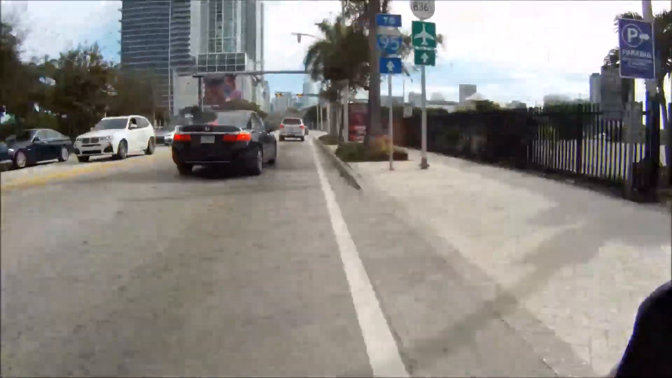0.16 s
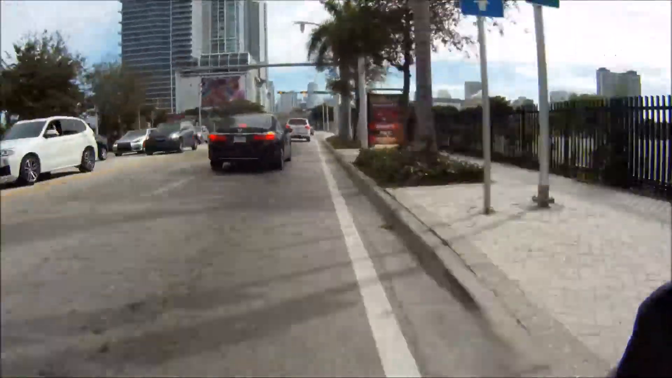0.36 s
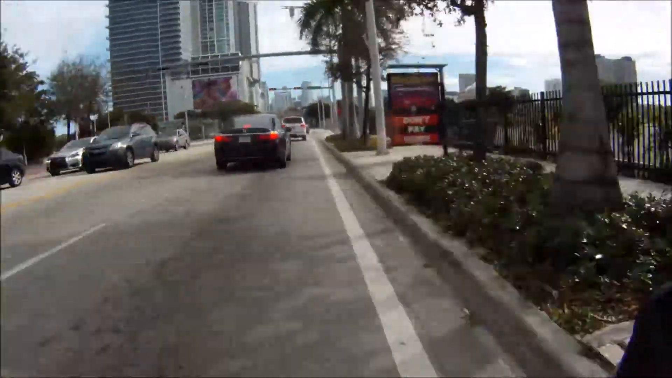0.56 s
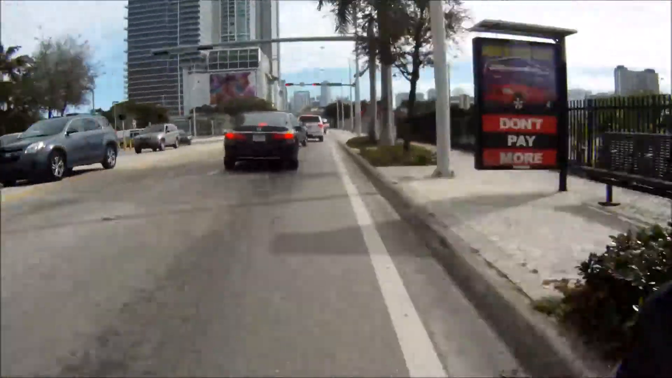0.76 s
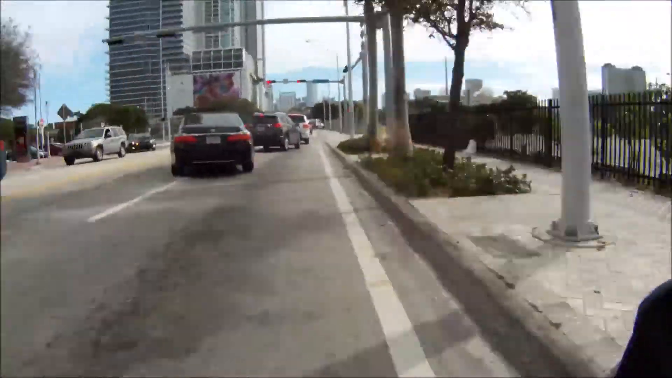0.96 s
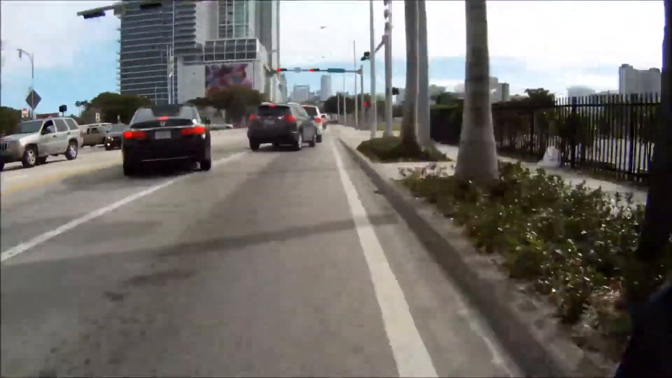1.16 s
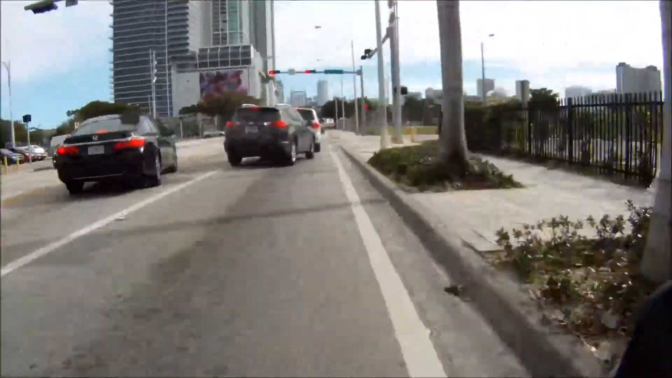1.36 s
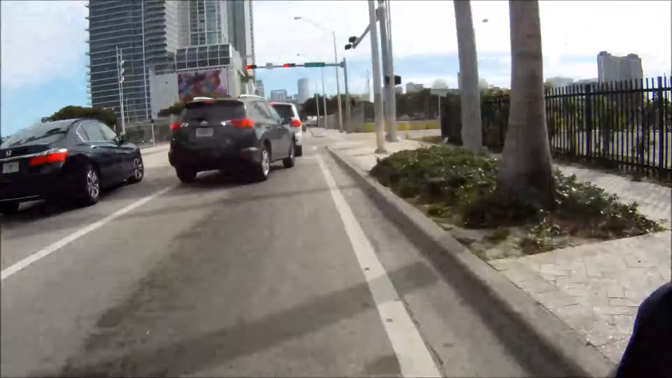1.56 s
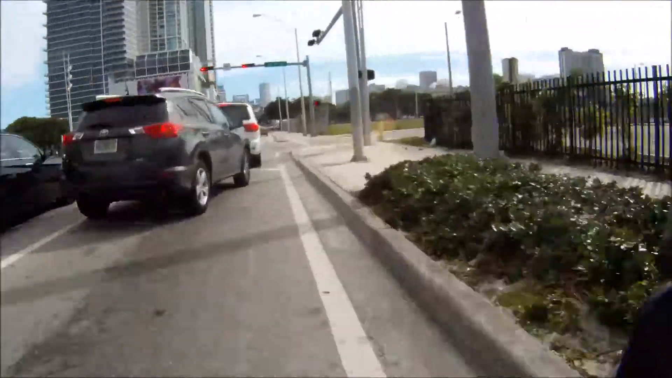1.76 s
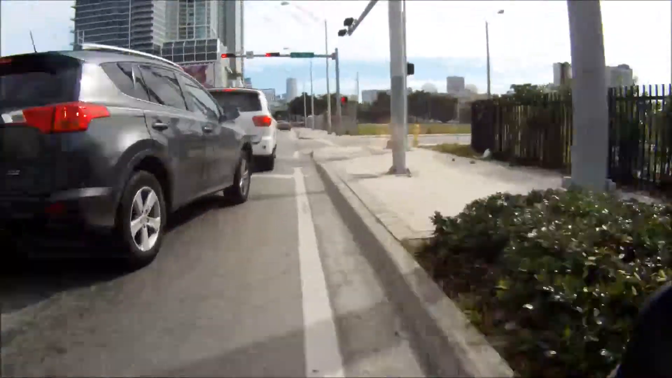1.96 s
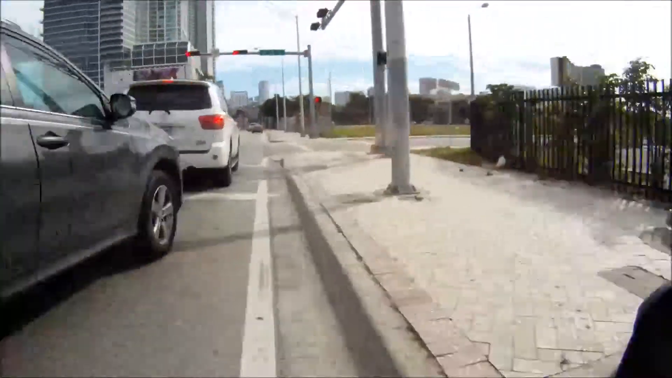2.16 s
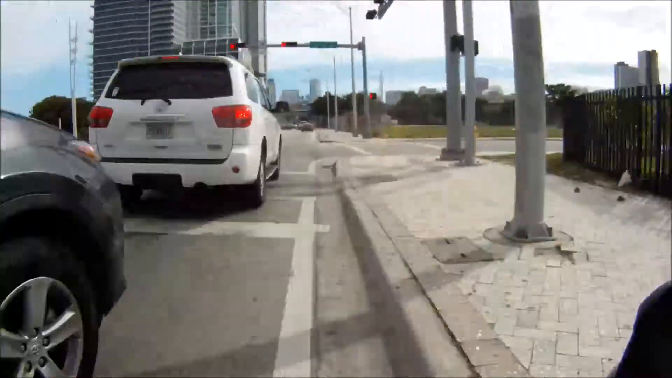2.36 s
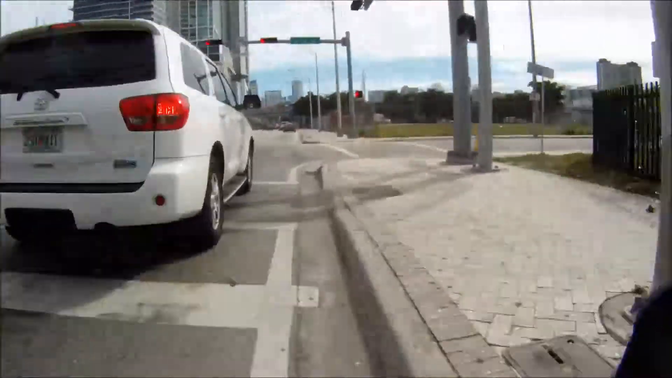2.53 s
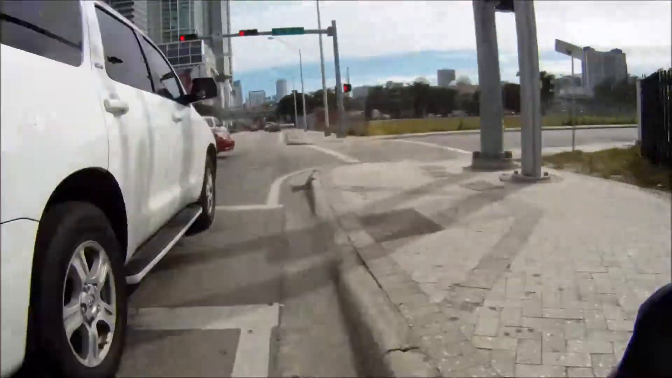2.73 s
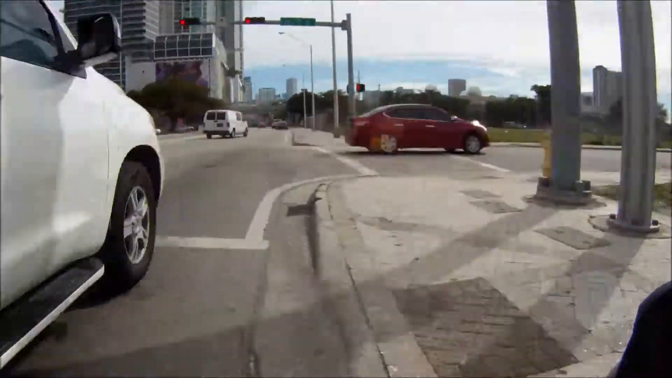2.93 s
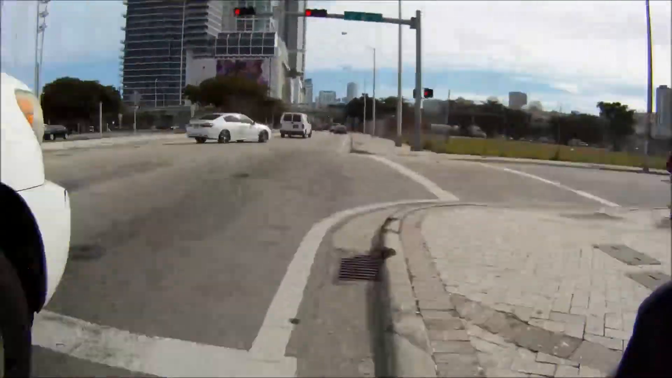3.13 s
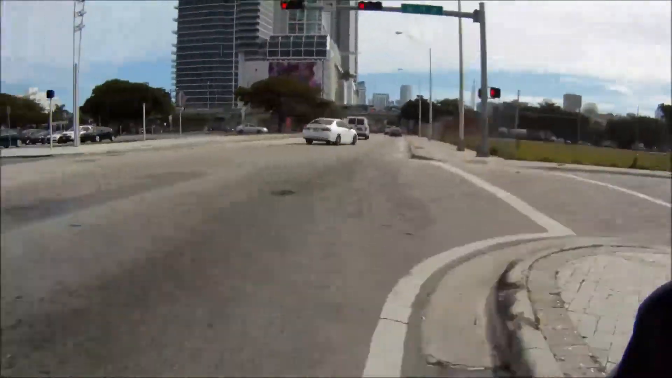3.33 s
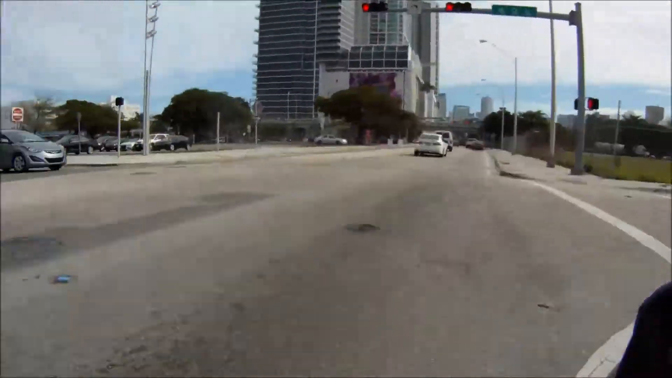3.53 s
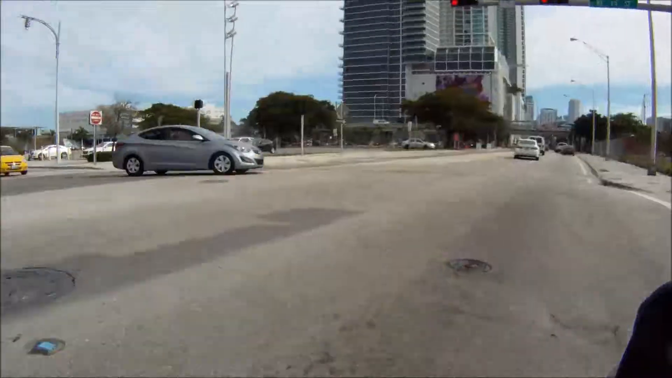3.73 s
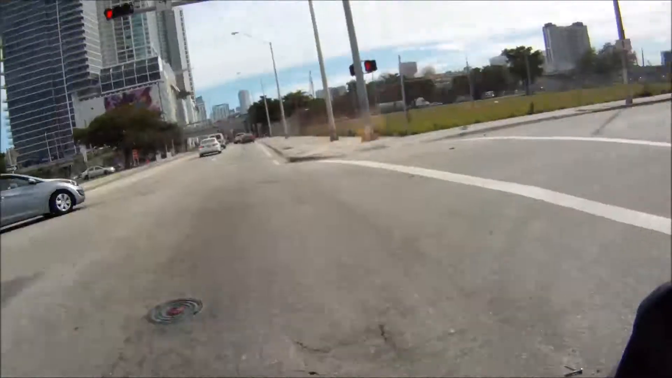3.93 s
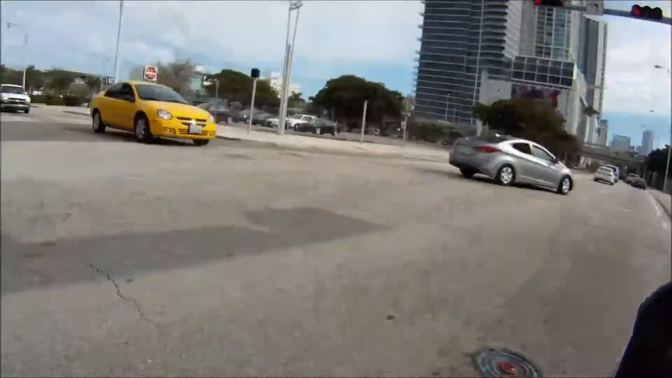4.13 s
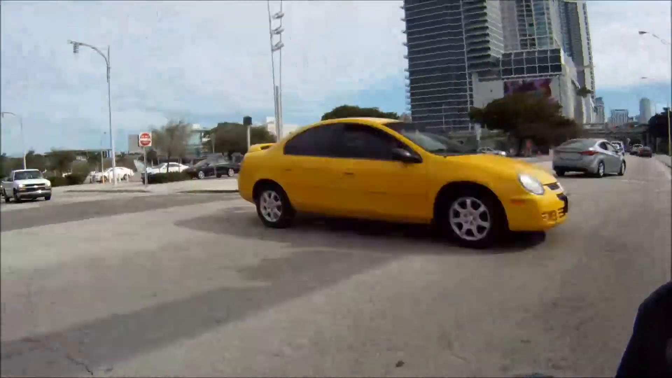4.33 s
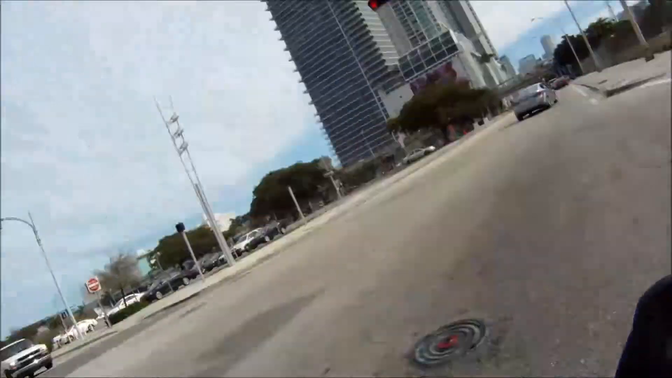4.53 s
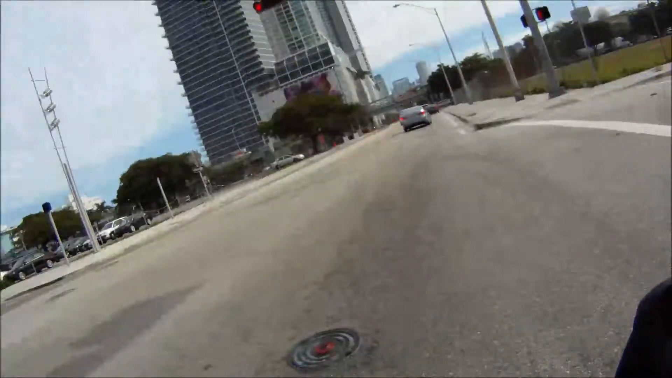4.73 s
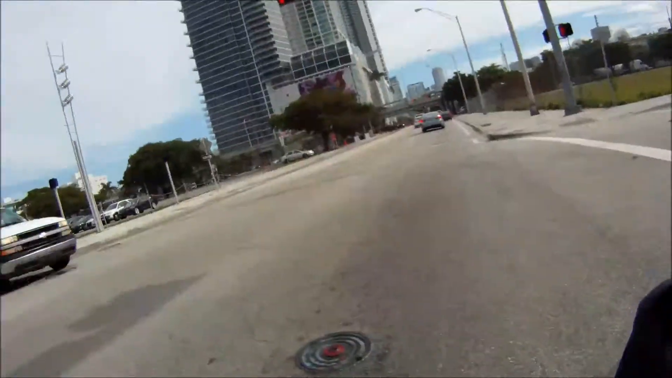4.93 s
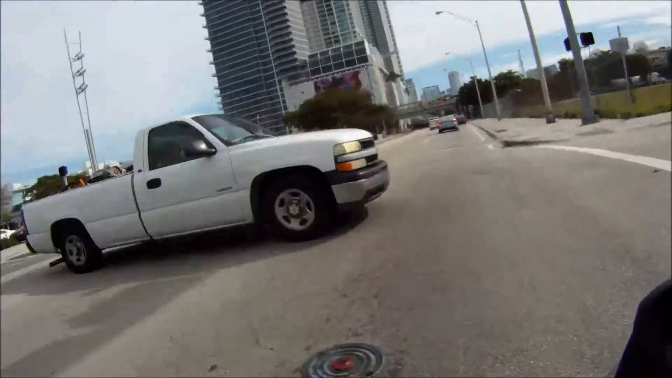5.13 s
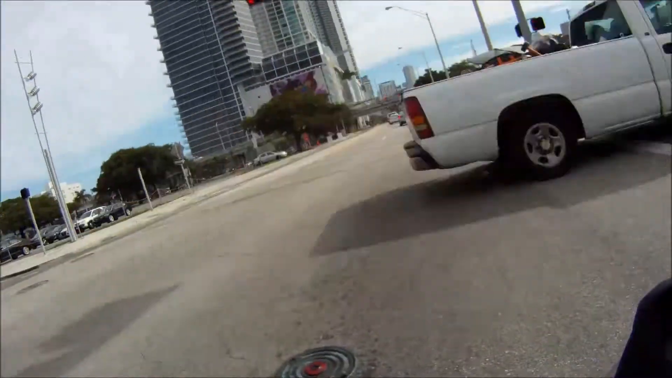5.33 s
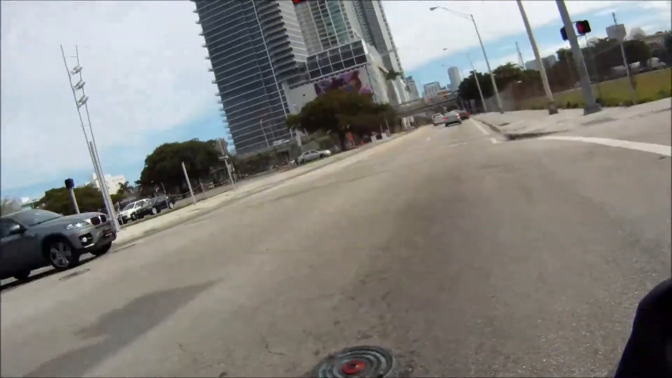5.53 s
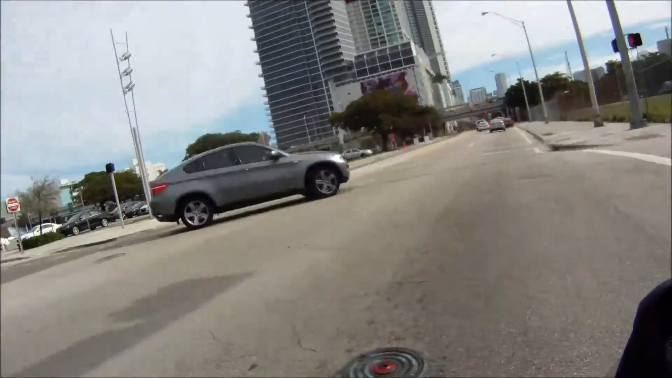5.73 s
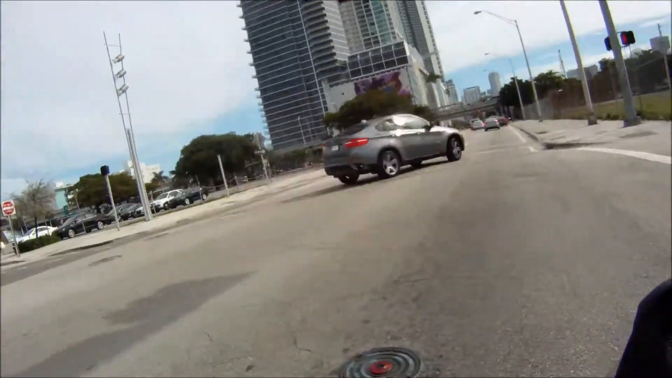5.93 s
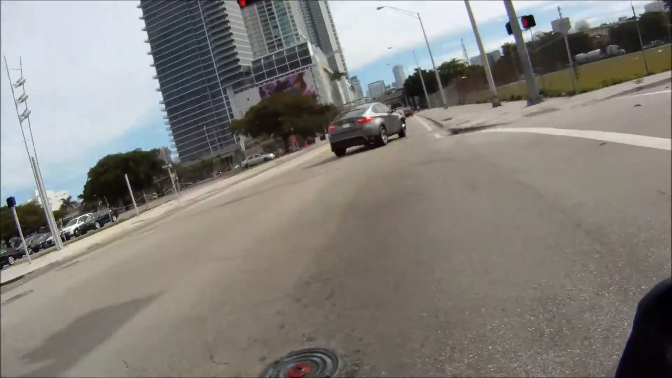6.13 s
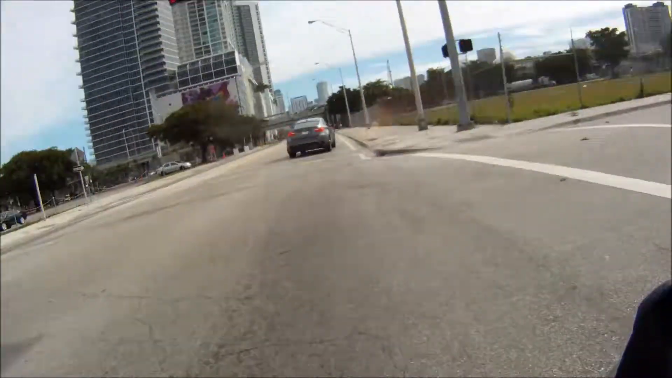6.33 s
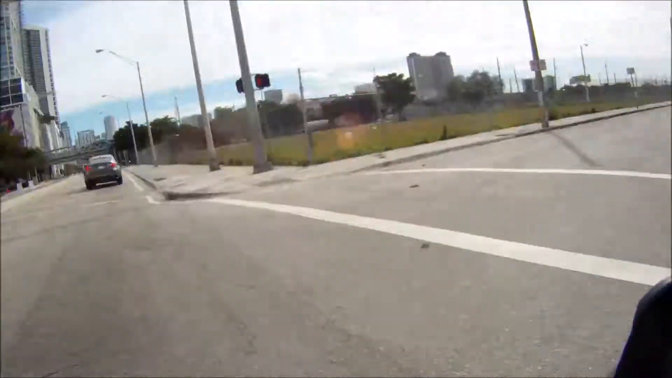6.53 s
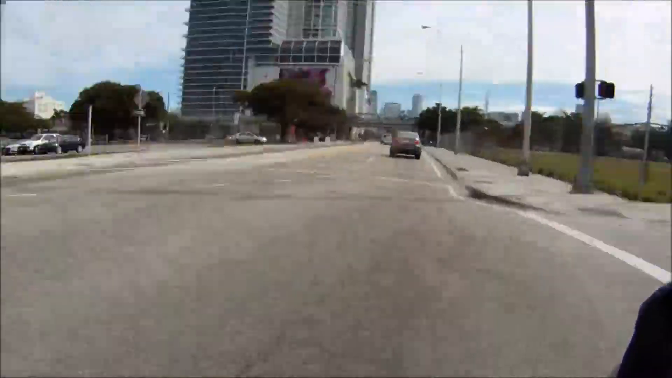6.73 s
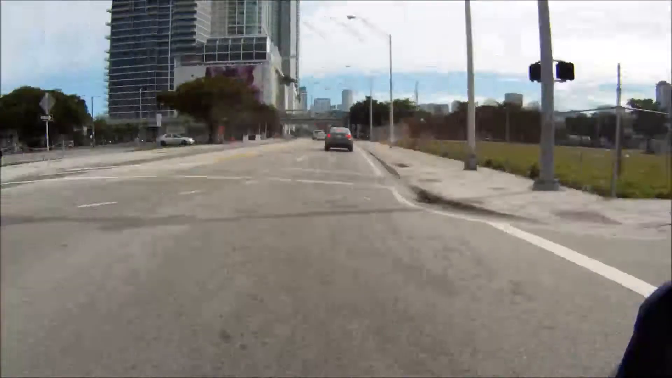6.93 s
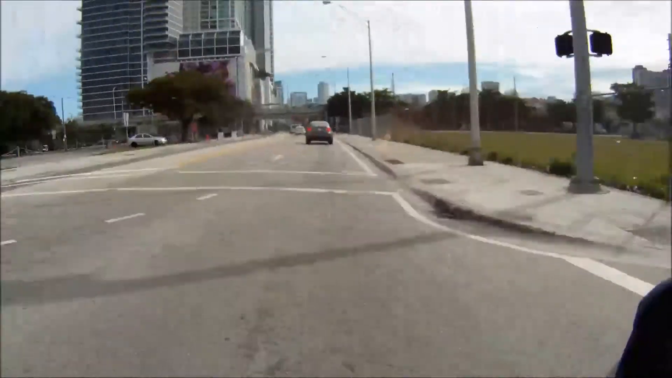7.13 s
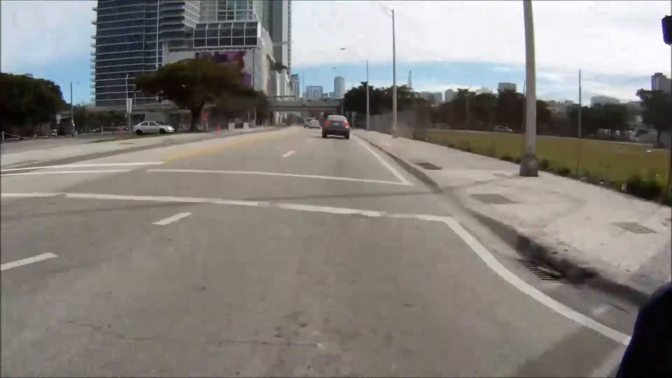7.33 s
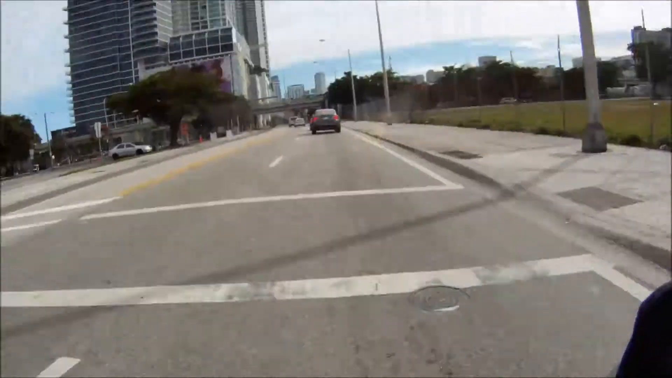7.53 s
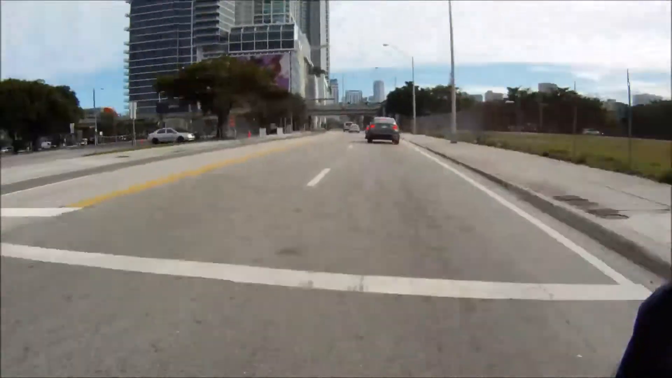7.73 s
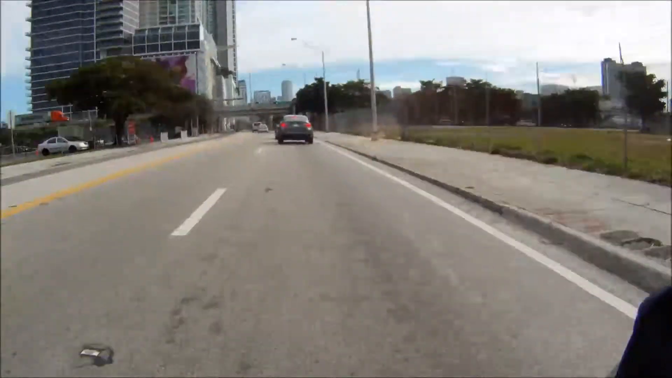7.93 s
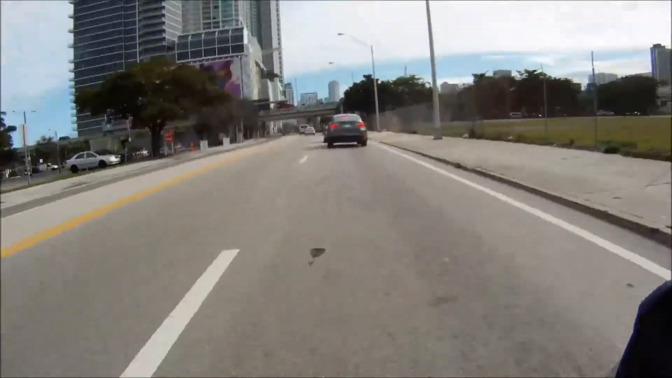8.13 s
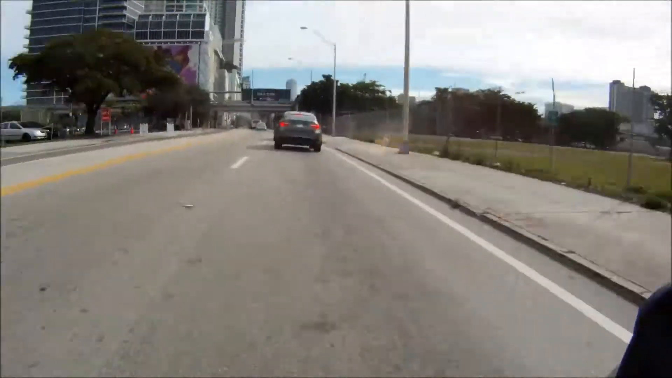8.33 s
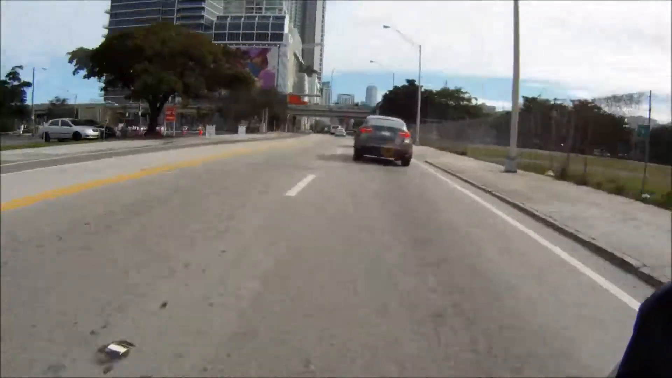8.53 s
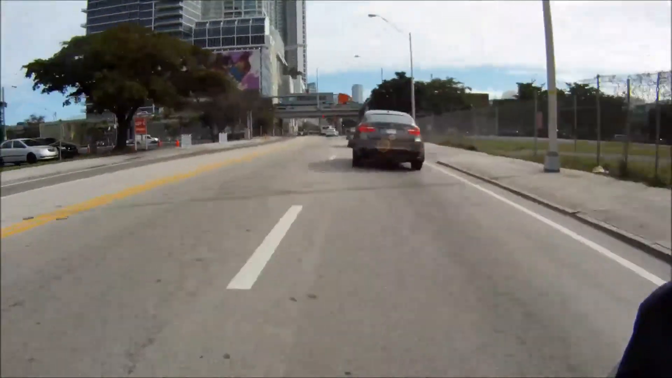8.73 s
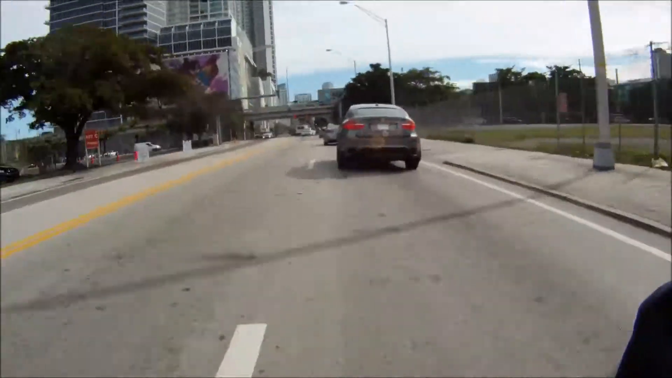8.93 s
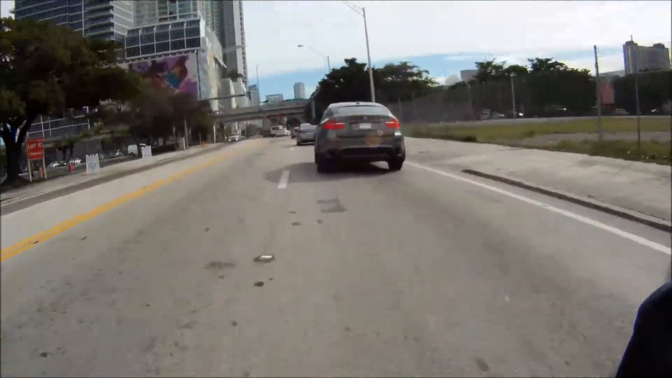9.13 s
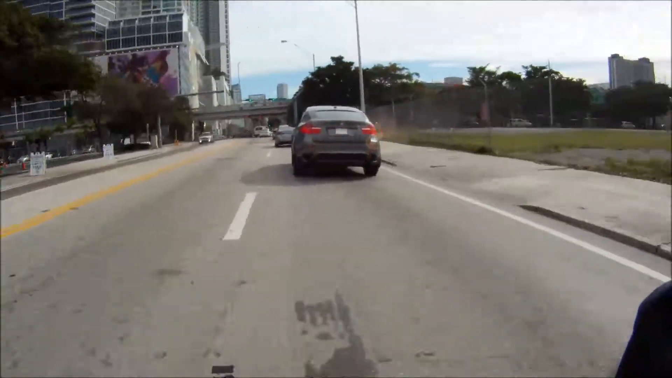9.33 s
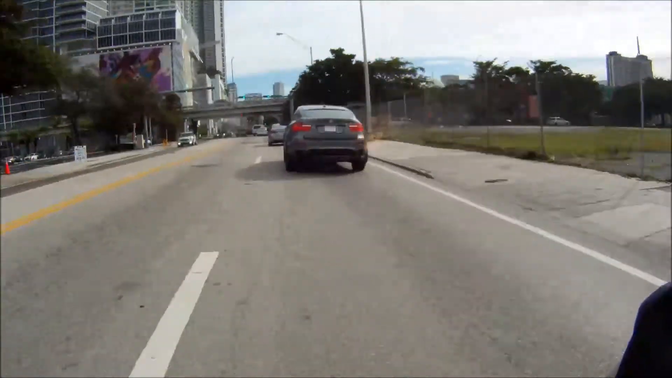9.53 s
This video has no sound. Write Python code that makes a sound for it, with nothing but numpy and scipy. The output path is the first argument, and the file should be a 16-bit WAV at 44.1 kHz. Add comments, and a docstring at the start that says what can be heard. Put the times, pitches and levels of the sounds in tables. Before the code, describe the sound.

A bike rolls on city asphalt, heard close, boxy and dull. Steady rumble gives way to fast clattering and thudding over rough ground, then quieter bumpy rolling. Hard isolated clacks, clicks and rubs mark the stop, followed by a near-silent pause over thin hiss. A sharp knock and short squeak begin the restart, a few more clacks follow, and a slightly singing road rumble continues to the end.

```python
"""Rumble, knocks, rattles and scrapes of a bicycle that rolls on asphalt, stops and sets off again.
A microphone in a closed plastic housing is clamped to it and hears it mostly through the frame.
Noise for the road, clicks for loose parts and short bursts for knocks drive the resonances of mount,
tubes and housing; thin steel rings, brief narrow tones squeak or ring on, jolts swing the mount,
and faint hiss lies under it all."""
import sys
import numpy as np
from scipy import signal
from scipy.fft import rfft, irfft
from scipy.io import wavfile

SR = 44100
rng = np.random.default_rng(int(sys.argv[2]) if len(sys.argv) > 2 else 0)


def dump_mix(stems):
    """Bounce the given channels to the path in sys.argv[1] as a 16-bit WAV at rate SR."""
    frames = np.atleast_2d(stems).T  # one column per channel
    limited = np.clip(frames, -1, 1)  # hard clip at full scale
    pcm = np.round(limited * 32767).astype(np.int16)
    wavfile.write(sys.argv[1], SR, pcm)


N = 426447

# knocks: (time [s], blow level [dB], share of tubes, of housing, of sizzle [dB re blow, rms of first 10 ms],
# housing pitch [Hz], sizzle pitch [Hz], ring of thin steel [dB re blow])
KNOCKS = [(0.7076, -15.5, -18, -10, -20, 3680, 8590, -10), (0.971, -14.5, -4, -15, -26, 3100, 6900, -8),
          (0.9833, -15, -1, -10, -23, 2280, 6350, 0), (1.0051, -12.5, -5.5, -7, -32, 2230, 6770, -18),
          (1.0416, -24, -8, -10, -30, 2300, 6800, -12), (1.0575, -24, 0.5, -18, -28, 2200, 6800, -12),
          (1.066, -15.5, -2.5, -14, -26, 3270, 6260, -15), (1.0784, -15, -0.5, -10, -21, 1990, 8500, -14),
          (1.1027, -14.5, -2, -9, -17, 2200, 6700, -21), (1.158, -20.5, 0, -22, -28, 2200, 6800, -12),
          (1.1773, -17, -5, -15, -31, 3300, 6800, -7), (1.2072, -16, -6, -10.5, -29, 2200, 6800, -12),
          (1.2155, -16, -8, -13, -26, 2210, 6800, -12), (1.258, -4, -11, -15.5, -28.5, 1980, 7070, -19),
          (1.271, -16, 0.5, -17, -26, 2230, 6800, -12), (1.2885, -26, -16, -7, -28, 3300, 6800, -12),
          (1.3159, -12, -3, -7.5, -33, 2300, 6340, -18), (1.3434, -19, -4, -17, -26, 3300, 6800, -12),
          (1.379, -19, -4, -14, -28, 2200, 6800, -12), (1.4038, -16, -2.5, -12, -29, 2300, 6800, -4),
          (1.4341, -6, -13, -17.5, -35, 3080, 8260, 2.5), (1.451, -23, 2, -22, -28, 2300, 6800, -12),
          (1.4696, -25, -2, -15, -28, 2180, 6800, -12), (1.505, -23, -1, -18, -30, 2200, 6800, -12),
          (1.5195, -20, -1, -14, -26, 3300, 6800, -12), (1.5324, -17.5, 1, -8.5, -21, 3200, 6540, -8),
          (1.5663, -17, -3, -13.5, -26, 3180, 6260, -10), (1.6612, -18, -0.5, -10, -25, 3240, 8360, -16),
          (1.679, -20, 0, -18, -24, 2250, 6800, -14), (1.716, -23, -0.5, -16, -22, 3380, 8440, -10),
          (1.7489, -21.5, 4, -18, -24, 3330, 9520, -14), (1.8108, -37, -20, -21, -3, 2330, 10500, -10),
          (1.8504, -31, -19, -17, -7.5, 2370, 6630, -10), (1.9083, -3.5, -21.5, -17, -22, 2970, 7180, -4.5),
          (2.06, -17.5, -12, -25, -18.5, 2200, 6580, 5.5), (2.1231, -18, -17, -17, -12.5, 2030, 6600, -10),
          (2.41, -26.5, -20, -10, -18, 3700, 6600, -15), (3.342, -28.5, -20, -9, -22, 3300, 6600, -15),
          (3.524, -23, -23, -16, -13, 3680, 6380, -15), (3.5849, -11.5, -25, -9, -10.5, 3930, 6740, -25),
          (3.7559, -5, -19, -9.5, -29.5, 3450, 8300, -1.5), (3.771, -27, -30, -25, -8, 3400, 8500, -20),
          (3.7969, -16, -15, -8, -24, 3020, 6600, 0), (3.8668, -24.5, -30, -10.5, -15, 2170, 7200, -8),
          (3.8942, -15.5, -37, -9.5, -17.5, 4070, 5570, -18), (3.941, -22, -27, -17, -16, 3140, 10100, -13),
          (3.9902, -20.5, -23, -16, -8.5, 3040, 6800, -9), (4.0382, -23, -35, -9.5, -16, 2160, 8800, -6),
          (4.2028, -27, -19, -4, -35, 2170, 10200, -12), (4.2732, -4.5, -14, -8, -34, 2770, 8600, 1.5),
          (4.322, -10.5, -31, -23, -19.5, 3800, 6640, -20), (4.42, -34, -29, -8, -20, 3600, 6800, -12),
          (4.4265, -33, -29, -11, -12, 3300, 9900, -12), (4.449, -37, -29, -14, -9, 3300, 10200, -12),
          (4.482, -26, -11.5, -17, -19, 3780, 9900, -19), (4.5423, -17.5, -30, -15, -26, 3900, 6860, -10),
          (4.582, -27, -28, -8, -14, 3300, 8400, -16), (4.607, -32, -25, -12, -11, 4200, 10300, -12),
          (4.6201, -26.5, -11, -8, -18, 3680, 6430, -11), (4.665, -32.5, -30, -20, -8, 3600, 7500, -15),
          (4.6708, -26.5, -30, -36, -7.5, 2240, 8100, -4.5),
          (4.7252, -33.5, -6, -9, -24, 3840, 6870, -14.5), (4.745, -37, -21, -12, -21, 4200, 6800, -12),
          (4.767, -38, -11, -16, -23, 2700, 6800, -12), (4.785, -27, -10, -18, -24, 2100, 8810, -8.5),
          (4.8282, -19, -20, -10.5, -27, 3450, 8870, 4), (4.837, -19.5, -7, -12, -22, 2220, 8800, -14.5),
          (4.9621, -38, -29, -6, -6, 3350, 6590, -4.5), (5.004, 8, -33, -16.5, -30, 2960, 8200, -5.5),
          (5.0355, -22, -13, -12, -17, 2020, 8780, -13), (5.0665, -14.5, -9.5, -13, -24, 2070, 8400, 5.5),
          (5.1422, -3.5, -36, -7, -18, 2390, 6700, 0.5), (5.178, -31, -10, -18, -11, 2620, 6420, -13.5),
          (5.218, -30, -21, -8, -10, 2720, 7080, -8), (5.2627, 4, -19.5, -18, -31.5, 2260, 8150, -3),
          (5.4045, -24.5, -42, -30.5, -9, 2020, 10400, -16), (5.43, -26, -17, -15, -20, 2700, 6690, 2),
          (5.4833, -14.5, -25.5, -13, -14.5, 2740, 6660, -6.5),
          (5.5966, -34, -9.5, -20, -13, 3820, 7050, 2), (5.6474, -32.5, -21, -11, -17, 3800, 9800, 0),
          (6.0885, -15.5, -15, -16, -15, 3840, 6500, -17), (6.0955, -19, -10, -16, -8, 2500, 6350, -17),
          (6.1035, 0, -17, -5, -7, 3070, 6400, -10), (6.262, -35, -22, -12, -25, 3200, 6900, -14),
          (6.2716, -25, -19, -16, -16, 2150, 6920, -14), (6.3729, -21.5, -17, -14.5, -22, 4030, 6510, 10.5),
          (6.4033, -14.5, -26, -17, -25, 2160, 7200, -0.5), (6.4312, -19.5, -9, -9, -31, 2220, 8370, -7),
          (6.4901, -29, -8, -7.5, -16, 3350, 5530, -17), (6.6824, -24.5, -15, -10, -21, 2760, 9580, -8),
          (6.9166, -17, -19, -14, -24, 2180, 6500, -3), (7.175, -2, -39, -5.5, -18.5, 2210, 7550, -2),
          (7.854, -26, -30, -25, -14, 4400, 6900, -20), (7.878, -22, -30, -30, -15, 2200, 8800, -20),
          (7.8845, -14, -11, -9.5, -32, 2070, 8790, -18), (8.0975, -32, -25, -18, -17, 3300, 9500, -20),
          (8.272, -22.5, -25, -9, -25, 3300, 8800, -20), (8.156, -13, -4, 5, -10.5, 3120, 6040, 7.5)]
KNOCK_S, BLOW_DB, TUBES_DB, HOUSING_DB, SIZZLE_DB, HOUSING_HZ, SIZZLE_HZ, RING_DB = np.transpose(KNOCKS)
# looseness of rattling parts: (time [s], level [dB re rolling])
LOOSE = [(0, -15.5), (.91, -20), (.94, -2.5), (1.74, -5), (1.8, -19), (2.5, -12.5), (2.6, -6.5), (2.9, -8),
         (3.4, -13.5), (4.5, -13), (4.6, 2), (5.0, -15), (6.3, -12), (7.0, -12), (7.3, -19), (9.67, -16.5)]
# jolts that swing the mount: (time [s], swing peak [dB], deep thump peak [dB])
JOLTS = [(0.21, -15, -44), (0.26, -40, -43), (1.002, -14, -26), (1.066, -18, -16), (1.1, -8, -35),
         (1.19, -14.5, -16), (1.249, -13, -18), (1.314, -12.5, -32), (1.369, -9, -25), (1.434, -6, -35),
         (1.499, -9, -23), (1.581, -14, -25), (1.638, -13, -28), (1.766, -13, -47), (1.854, -7.5, -52),
         (2.147, -17, -53), (2.28, -7.5, -43), (2.469, -20, -53), (2.565, -18, -41), (2.664, -11, -42),
         (2.817, -3.5, -42), (3.03, -11.5, -49), (3.293, -7, -43), (3.767, -12.5, -52), (4.265, -9.5, -28),
         (4.45, -32, -46), (4.509, -28, -33), (4.563, -31, -34), (4.62, -25, -45), (4.654, -21, -29),
         (4.794, -38, -21), (4.84, -18, -22.5), (5.005, -20, -32), (5.067, -18, -35), (5.157, -22, -59),
         (5.276, -16.5, -25), (5.435, -32.5, -60), (5.484, -30.5, -64), (5.595, -34, -64.5),
         (6.09, -16.5, -25), (6.135, -19, -51), (6.413, -14, -30), (6.85, -11.5, -40), (7.095, -11.5, -56),
         (7.223, -10.5, -43), (7.827, -13, -45), (7.958, -12, -45), (8.361, -18, -42), (8.461, -12, -48),
         (9.109, -11.5, -45)]
JOLT_TIMES_S, SWING_DB, THUMP_DB = np.transpose(JOLTS)
# resonances of each part: (frequency [Hz], width [Hz], level [dB])
MOUNT = [(123.8, 22.1, 7), (94.4, 73, -10.5), (181.7, 120, -9), (286, 44, -13), (362, 58, -29)]
TUBES = [(492.6, 56.4, -2.5), (657, 65, 4), (761, 65.5, -1), (424, 190, -25), (982, 155, -11)]
HOUSING = [(2079, 292, 8), (2300, 145, 15), (2566, 1790, 9), (3370, 284, 12), (3813, 100, 7.5),
           (4574, 256, 0.5), (1740, 2700, 2)]
SIZZLE = [(5230, 810, 14.5), (6550, 144, 18.5), (7120, 370, 15), (8490, 420, 17), (9680, 1210, 19),
          (10030, 2300, 11.5), (13200, 1300, -32)]
PARTS = [MOUNT, TUBES, HOUSING, SIZZLE]


def from_db(db):
    """Decibels to gain."""
    return 10 ** (np.asarray(db) / 20)


def rms_one(x):
    """Scale to unit rms."""
    return x / np.sqrt(np.mean(x ** 2) + 1e-20)


def curve(table):
    """Straight lines through (time [s], value) points, per sample."""
    return np.interp(np.arange(N) / SR, *np.transpose(table))


def drift(corner_hz):
    """Slow random wobble of unit rms: two-pole low-passed noise, made at a fortieth of the rate."""
    step = 40
    r = np.exp(-2 * np.pi * step * corner_hz / SR)
    noise = rng.standard_normal(N // step + 2002)
    slow = signal.lfilter([1], [1, -2 * r, r * r], noise)[2000:]   # drop the run-in
    return np.interp(np.arange(N) / step, np.arange(len(slow)), rms_one(slow))


def resonate(x, modes):
    """Parallel two-pole resonances with alternating signs."""
    out = 0
    for k, (hz, width_hz, level_db) in enumerate(sorted(modes)):
        r = np.exp(-np.pi * width_hz / SR)
        zeros = [(1 - r * r) / 2, 0, (r * r - 1) / 2]
        poles = [1, -2 * r * np.cos(2 * np.pi * hz / SR), r * r]
        out = out + (-1) ** k * from_db(level_db) * signal.lfilter(zeros, poles, x)
    return out


def body(x, modes):
    """A part of the bicycle: its resonances, band-limited by first-order skirts."""
    low_hz = min(modes)[0] * 0.81
    high_hz = min(max(modes)[0] * 1.5, 0.45 * SR)
    skirts = signal.butter(1, [low_hz, high_hz], "band", fs=SR, output="sos")
    return signal.sosfilt(skirts, resonate(x + 1e-18, modes))


def unit_gain(modes):
    """Gain that makes unit white noise leave the part at unit rms."""
    return 1 / np.std(body(rng.standard_normal(N), modes))


def bicycle():
    """Road, rattles, knocks and jolts drive each part; their swells are partly shared, mostly their own."""
    # rolling: (time [s], mount shake, tube rumble, tyre hiss in the housing, fine sizzle [dB each])
    ride = [(0, -24, -30, -26.5, -44), (.88, -23.5, -30, -26, -42), (.96, -21, -27, -28.5, -44.5),
            (1.7, -24, -30, -34.5, -48.5), (1.8, -26, -31.5, -36.5, -50), (2.5, -24, -35, -41, -50.5),
            (2.62, -15, -31, -38.5, -50), (2.92, -18.5, -33, -39.5, -49.5), (3.4, -25, -35, -42.5, -53),
            (3.85, -31, -42.5, -49.5, -52.5), (4.12, -41, -47, -50, -47), (4.36, -42.5, -55.5, -50.5, -50),
            (5.25, -49, -54.5, -63, -50), (5.68, -60, -61.5, -65, -57.5), (6.07, -61, -73, -67, -59),
            (6.14, -37.5, -55, -52.5, -52), (6.45, -28, -36, -43.5, -51.5), (6.95, -28.5, -34.5, -39, -52),
            (7.35, -21.5, -27.5, -33, -48.5), (8.3, -24, -31, -32, -46), (9.2, -23.5, -26.5, -30.5, -46),
            (9.67, -23, -27.5, -30, -43)]
    # rattle in mount, tubes, housing, sizzle [dB re rolling]
    rattle_db = [-10, -4, -5, -3]
    # swell by road waviness of mount, tubes, housing, sizzle [dB]
    waviness_db = [1.9, 1.6, 1.2, 1.5]
    # dull path of the rattles through the clamp: (frequency [Hz], width [Hz], level [dB])
    thud = [(397, 580, 1.3), (153, 450, 2.8)]
    # broad path of a noise burst past the tube resonances: (frequency [Hz], width [Hz], level [dB])
    ragged = [(326, 390, 8), (530, 260, 9.5), (930, 160, -1), (1500, 2300, -18)]
    thud_db, ragged_db, burst_tubes_db = 7.5, -2, 1

    times_s, *columns = np.transpose(ride)
    levels_db = [np.interp(np.arange(N) / SR, times_s, column) for column in columns]
    shared_swell = drift(14.7)
    uneven = from_db(4.5 * drift(120))
    rattle = rattling()
    bounces_s = rng.uniform(0.0002, 0.0007, len(KNOCKS))   # rough gap, rounded later to whole cycles
    out = np.zeros(N)
    for k, modes in enumerate(PARTS):
        white = rng.standard_normal(N)
        swell_db = waviness_db[k] * (0.5 * shared_swell + 0.92 * drift(25.0))
        road = white * from_db(swell_db) + from_db(rattle_db[k]) * rattle
        grit = noise_bursts(k, white * uneven)
        force = from_db(levels_db[k]) * road
        force += from_db(burst_tubes_db if modes is TUBES else 0) * grit
        if modes is TUBES:
            out += unit_gain(ragged) * body(from_db(ragged_db) * grit, ragged)
        if modes is HOUSING:
            force += jangle(white)
        sound = body(unit_gain(modes) * force, modes) + blows(k, bounces_s)
        if modes is MOUNT:
            sound += jolts(lambda x: body(x, MOUNT), MOUNT[0][0], SWING_DB)
            out += ticks(sound)
        if modes is SIZZLE:
            sound += air(force)
        out += sound
    out += from_db(levels_db[1] + thud_db) * unit_gain(thud) * body(rattle, thud)
    out += singing_tube(levels_db[1])
    return out + cracks() + spokes() + narrow_tones() + sway(levels_db[0])


def rattling():
    """Loose parts: random clicks of uneven size and sign, louder where things are looser."""
    clicks_per_s, spread_db = 95, 5.5
    sizes = from_db(spread_db * np.minimum(rng.exponential(1, N), 2.5)) * rng.choice([-1, 1], N)
    clicks = rms_one(sizes * (rng.random(N) < clicks_per_s / SR))
    return clicks * from_db(curve(LOOSE))


def singing_tube(rumble_db):
    """One tube sings on smooth asphalt: noise through a narrow resonance."""
    # (time [s], level [dB re tube rumble])
    sing = [(0, -8), (1, -12), (6.5, -14), (7.3, -5.5), (8.4, -5.5), (9, -1), (9.67, -7)]
    # (frequency [Hz], width [Hz], level [dB])
    sing_mode = [(658, 28, 0)]
    tone = rms_one(resonate(rng.standard_normal(N), sing_mode))
    return from_db(rumble_db + curve(sing)) * tone


def air(force):
    """Top treble of the sizzle's drive leaks past the housing."""
    # (time [s], level [dB re sizzle drive])
    leak = [(0, -22), (3.3, -13), (3.8, -14), (4.5, -5), (5.5, -7), (5.7, -16), (6.3, -4.5), (7.4, -14),
            (7.7, -31), (9.67, -36)]
    treble = signal.butter(4, 11500, "high", fs=SR, output="sos")
    return from_db(curve(leak)) * signal.sosfilt(treble, force)


def blows(k, bounces_s):
    """All knocks as heard in part k, with its own resonance widths for knocks."""
    # drive time in mount, tubes, housing, sizzle [s]
    contact_s = [0.00051, 0.00043, 0.00011, 0.0001]
    # width factor of the resonances of mount, tubes, housing, sizzle; the housing uses the next table
    width_factor = [0.51, 1.65, 2.1, 1.74]
    # the housing under knocks: (frequency [Hz], width [Hz], level [dB])
    clack = [(1440, 340, -23), (1794, 150, 1), (2200, 270, 5), (2700, 410, -3.5), (2725, 130, 2.5),
             (3144, 170, 2), (3485, 190, 5), (3870, 260, 1.5), (4360, 180, -2.5), (5200, 660, -18.5)]
    mount_share_db, off_pitch_db_per_octave = -36, -4.5
    spread_db = clack_spread(np.array(clack)[:, 0])
    knock_modes = [(hz, width_factor[k] * width_hz, db) for hz, width_hz, db in PARTS[k]]
    out = np.zeros(N)
    for j, (s, blow_db, *shares_db, housing_hz, sizzle_hz, _) in enumerate(KNOCKS):
        if PARTS[k] is HOUSING:   # modes far from the knock's own pitch answer less
            knock_modes = [
                (hz, width_hz, db + extra_db + off_pitch_db_per_octave * abs(np.log2(hz / housing_hz)))
                for (hz, width_hz, db), extra_db in zip(clack, spread_db[j])]
        pitch_hz = [MOUNT[0][0], TUBES[1][0], housing_hz, sizzle_hz][k]
        burst = knock(knock_modes, contact_s[k], pitch_hz, bounces_s[j])
        i = round(s * SR)
        out[i:i + len(burst)] += from_db(blow_db + [mount_share_db, *shares_db][k]) * burst
    return out


def clack_spread(modes_hz):
    """Level offset [dB] of each housing mode per knock: random, but given for nine chosen knocks."""
    # centres of the colours [Hz]
    colour_hz = [1600, 2200, 2900, 3500, 4400]
    # colour of nine chosen knocks: (time of the knock [s], level near each of the five centres [dB])
    colours = [(3.5849, -12, -10, 5, -1, -2), (3.7559, 0, 5, -5, 1, -14), (4.2732, 0, -0.5, 3, -1, -14),
               (5.004, 6.5, 1, 2, -3.5, -7), (5.1422, -4, -1, -3, 8, 5), (5.2627, 4, -1.5, 5, 3, 4),
               (6.1035, -12, 0, 6, 1.5, 6), (7.175, -6, 2.5, 3, -1, -1), (8.156, -2, -1, 1, 1, 1)]
    spread_db = rng.normal(0, 6, (len(KNOCKS), len(modes_hz)))
    for s, *zone_db in colours:
        spread_db[np.argmin(abs(KNOCK_S - s))] = np.interp(modes_hz, colour_hz, zone_db)
    return spread_db


def knock(modes, contact_s, hz, bounce_s):
    """A burst of force starts at once, dies away and touches again; the answer has unit rms over 10 ms."""
    bounce_share = 0.4
    t = np.arange(SR // 25) / SR
    touch = (t + 3 * contact_s) * np.exp(-t / contact_s) * np.cos(2 * np.pi * hz * t)
    gap_s = np.round(bounce_s * hz) / hz   # whole cycles of the part's pitch
    bounce = bounce_share * np.interp(t - gap_s, t, touch, left=0)
    answer = body(touch + bounce, modes)
    return answer / np.sqrt(np.mean(answer[:SR // 100] ** 2))


def strikes(db):
    """One click per knock, of the given size."""
    clicks = np.full(N, 1e-18)
    clicks[np.round(KNOCK_S * SR).astype(int)] = from_db(db)
    return clicks


def cracks():
    """One broad sharp spike just after each knock starts, harder where parts are looser."""
    crack_db, lag_s, loose_share = 11.5, 0.0008, 0.64   # peak re housing share, before looseness
    edge = signal.butter(2, (1000, 5200), "band", fs=SR, output="sos")
    loose_db = loose_share * np.interp(KNOCK_S, *np.transpose(LOOSE))
    clicks = np.roll(strikes(BLOW_DB + HOUSING_DB + crack_db + loose_db), round(lag_s * SR))
    impulse = np.eye(1, 64)[0]
    return -signal.sosfilt(edge, clicks) / signal.sosfilt(edge, impulse).max()


def jangle(white):
    """Diffuse tail in the housing: noise that dies away exponentially after each knock."""
    tail_db, t60_s = -34, 0.2
    decay = from_db(-60 / (t60_s * SR))
    return white * signal.lfilter([1], [1, -decay], strikes(BLOW_DB + RING_DB + tail_db))


def spokes():
    """Knocks set thin steel ringing: decaying sine modes, each wavering in strength."""
    # (frequency [Hz], level [dB], t60 [s])
    steel = [(327, -23.5, 0.18), (403, -41, 0.38), (481, -31, 0.18), (1530, -45.5, 0.53),
             (1660, -48.5, 0.27), (1770, -51, 1), (1920, -26, 0.11), (2000, -54, .6), (2015, -30.5, 0.58),
             (2054, -32, 0.23), (2137, -42.5, 0.54), (2220, -49, 0.41), (2170, -46, 0.36),
             (2300, -38.5, .2), (2750, -40, 0.13), (2980, -50, .25), (3150, -50, 0.33), (3500, -40, 0.25),
             (3590, -40, .35), (3700, -35, .45), (3880, -42.5, .2), (3820, -35, 0.19), (4230, -45, 0.28)]
    strengths_db = rng.normal(0, 2.5, (len(KNOCKS), len(steel)))
    out = np.zeros(N)
    for k, (hz, level_db, t60_s) in enumerate(steel):
        clicks = strikes(BLOW_DB + RING_DB + level_db + strengths_db[:, k])
        r, w = 10 ** (-3 / (t60_s * SR)), 2 * np.pi * hz / SR
        ring = signal.lfilter([0, np.sin(w)], [1, -2 * r * np.cos(w), r * r], clicks)
        out += ring * (0.8 + 0.35 * drift(80))
    return out


def noise_bursts(k, grit):
    """Short bursts of uneven noise that drive part k: rubs, scrapes, rolling swells and hits."""
    # (time [s], length [s], mount, tubes, housing, sizzle [dB each], sizzle pitch [Hz], its width [Hz])
    bursts = [(0.095, 0.17, -63, -71, -68, -51, 9250, 1400),
              (0.592, 0.053, -60, -41, -62, -41, 10000, 4000),
              (1.814, 0.016, -62, -67, -66, -41, 10700, 1500),
              (1.884, 0.042, -58, -64, -68, -43, 6700, 1000),
              (2.262, 0.029, -60, -42, -43, -60, 6000, 4000), (2.535, 0.04, -60, -60, -47, -67, 6000, 4000),
              (2.731, 0.04, -60, -60, -47, -65, 6000, 4000), (2.93, 0.033, -60, -60, -44, -62, 6000, 4000),
              (3.537, 0.063, -60, -70, -41.5, -42.5, 10000, 5000),
              (3.651, 0.05, -60, -52, -41, -74, 8000, 5000), (3.905, 0.095, -62, -57, -40, -63, 7000, 4000),
              (3.989, 0.28, -38, -46, -36, -80, 8100, 5050), (4.326, 0.02, -67, -62, -46, -43, 6670, 1200),
              (4.551, 0.03, -46, -45, -38, -30.5, 8450, 8000),
              (4.606, 0.041, -34, -39, -51, -65, 6500, 3000),
              (4.631, 0.038, -33, -31.5, -42, -57, 6500, 3000),
              (4.668, 0.026, -34, -47, -52, -69, 6500, 3000),
              (4.757, 0.018, -36, -41, -58, -74, 8000, 3000),
              (4.778, 0.065, -38, -37, -36, -54, 8400, 3000),
              (4.806, 0.065, -29, -48, -43, -63, 8400, 3000), (4.84, 0.05, -64, -58, -60, -44, 13900, 3020),
              (5.273, 0.019, -60, -51, -62, -37, 13000, 5000),
              (6.087, 0.0062, -55, -37, -38, -38, 6600, 3000),
              (4.849, 0.09, -65, -58, -53, -50, 9000, 1200), (4.87, 0.048, -70, -70, -70, -58, 6500, 700),
              (4.997, 0.0055, -50, -23.5, -25.5, -53, 7500, 4000),
              (5.249, 0.008, -48, -35, -31, -51, 6900, 2970),
              (5.392, 0.031, -64, -71, -52, -47, 10500, 2000),
              (5.457, 0.011, -37, -50, -34, -28.5, 8450, 6100),
              (5.525, 0.034, -70, -62, -81, -52.5, 9650, 2480),
              (6.091, 0.016, -22, -32, -37, -24, 6700, 5000),
              (6.127, 0.044, -23, -37.5, -49, -48, 8700, 2020),
              (6.185, 0.06, -71, -77, -77, -51.5, 8660, 3000),
              (7.356, 0.0041, -60, -64, -32, -52, 6000, 3000),
              (5.875, 0.039, -56, -60, -61, -80, 6000, 3000),
              (6.075, 0.011, -60, -62, -50, -61, 6000, 3000),
              (7.204, 0.059, -60, -50, -38, -61, 8000, 4000), (7.776, 0.057, -63, -57, -62, -41, 8700, 900),
              (7.783, 0.04, -70, -70, -70, -45, 6200, 1500), (7.815, 0.11, -49, -49, -67, -52, 8700, 1000)]
    out = np.zeros(N)
    for s, length_s, *part_db, hz, width_hz in bursts:
        i, n = round(s * SR), round(length_s * SR)
        burst = grit[i:i + n] * signal.windows.tukey(n, 0.3)
        if PARTS[k] is SIZZLE:   # each burst hisses at its own pitch
            burst = resonate(burst, [(hz, width_hz, 0)]) * np.sqrt(SR / (np.pi * width_hz))
        out[i:i + n] += from_db(part_db[k]) * burst
    return out


def narrow_tones():
    """Brief narrow tones of jittered frequency: rough squeaky glides, and delayed rings after knocks."""
    # (time [s], length [s], from [Hz], to [Hz], level [dB])
    tones = [(5.487, .02, 4530, 7040, -44), (6.135, .045, 2140, 2150, -49), (6.172, .03, 1250, 1550, -47),
             (6.178, .026, 1910, 2260, -37), (6.178, .021, 3650, 4700, -37), (6.195, .014, 4700, 6000, -42),
             (6.202, .024, 6000, 6600, -38), (6.22, .022, 6500, 6200, -46), (6.21, .05, 5200, 5500, -50),
             (7.205, .075, 1990, 2026, -30), (7.183, 0.069, 3700, 3450, -27.5), (7.2, .05, 4100, 4270, -40),
             (7.79, .025, 5200, 5900, -43), (8.173, 0.039, 1990, 2080, -27)]
    jitter_hz = 450
    out = np.zeros(N)
    for s, length_s, from_hz, to_hz, level_db in tones:
        i, n = round(s * SR), round(length_s * SR)
        glide_hz = np.linspace(from_hz, to_hz, n) + jitter_hz * rng.standard_normal(n)
        phase = 2 * np.pi * np.cumsum(glide_hz) / SR
        out[i:i + n] += from_db(level_db) * signal.windows.tukey(n, 0.6) * np.sin(phase)
    return out


def jolts(part, hz, peak_db):
    """The tyre gives and springs back: one soft push at the part's pitch, answered with the given peak."""
    push_s = 0.017
    n = round(push_s * SR)
    push = np.hanning(n) * np.sin(2 * np.pi * hz * np.arange(n) / SR)
    starts = np.zeros(N)
    starts[np.round(JOLT_TIMES_S * SR).astype(int)] = from_db(peak_db)
    answer_peak = np.abs(part(np.pad(push, (0, SR // 10)))).max()
    return part(signal.oaconvolve(starts, push)[:N]) / answer_peak


def ticks(mount_sound):
    """The clamp ticks at swing crests past its slack and at each knock: tiny top-treble noise bursts."""
    ticks_db, spread_db, slack, knock_db = -24, 6, 0.1, 4   # ticks re swing; slack in amplitude
    swing = signal.sosfilt(signal.butter(2, 250, fs=SR, output="sos"), mount_sound)
    crests, _ = signal.find_peaks(swing, height=slack)
    starts = strikes(BLOW_DB + SIZZLE_DB + knock_db)
    starts[crests] += swing[crests] * from_db(ticks_db + spread_db * rng.standard_normal(len(crests)))
    noise = signal.lfilter([1], [1, -0.97], starts) * rng.standard_normal(N)
    return signal.sosfilt(signal.butter(3, 10600, "high", fs=SR, output="sos"), noise)


def sway(shake_db):
    """The whole bicycle rocks: soft rumble below the mount resonance, with a thump at each jolt."""
    # (frequency [Hz], width [Hz], level [dB])
    sway_mode = [(68, 40, 0)]
    sway_db, wander_db = -24, 2   # re mount shake

    def frame(x):
        """The rocking mode, applied twice."""
        return resonate(resonate(x + 1e-18, sway_mode), sway_mode)

    level_db = shake_db + sway_db + wander_db * drift(3.3)
    rumble = from_db(level_db) * rms_one(frame(rng.standard_normal(N)))
    return rumble + jolts(frame, sway_mode[0][0], THUMP_DB)


def hiss():
    """Microphone noise and far traffic: steady noise with a smooth spectrum."""
    # (frequency [Hz], relative density [dB per Hz])
    spectrum = [(18, -41), (30, 4), (64, 4), (134, -39), (266, 7.5), (740, -3), (1670, -6.5), (1960, -19),
                (9460, -31.5), (13300, -14), (16000, -39)]
    rms_db = -59.5
    hz = np.maximum(np.arange(N // 2 + 1) * SR / N, 1)
    points_hz, points_db = np.transpose(spectrum)
    shape_db = np.interp(np.log(hz), np.log(points_hz), points_db)
    return from_db(rms_db) * rms_one(irfft(rfft(rng.standard_normal(N)) * from_db(shape_db), N))


def scene():
    """Both channels carry the same sound, set apart only by a faint, late copy of wavering level."""
    side_db, late_samples = -59, 200
    mid = bicycle() + hiss()
    side = from_db(side_db + 2 * drift(4.1)) * np.roll(mid, late_samples)
    return np.array([mid + side, mid - side])


def record(dry):
    """Gain control ducks after overloads and recovers; peaks clip; the top is cut."""
    ceiling_db, hold_fall_db_per_s, squeeze, cutoff_hz = -12, 153, 0.35, 16300
    level_db = 20 * np.log10(np.abs(dry).max(axis=0) + 1e-9)
    ramp_db = hold_fall_db_per_s * np.arange(N) / SR
    held_db = np.maximum.accumulate(level_db + ramp_db) - ramp_db   # peak hold that falls steadily
    target_db = -squeeze * np.maximum(held_db - ceiling_db, 0)
    duck_db = signal.lfilter([0.02], [1, -0.98], target_db)
    wet = np.clip(dry * from_db(duck_db), -1, 1)
    low_pass = signal.cheby2(12, 60, cutoff_hz, fs=SR, output="sos")
    return np.clip(signal.sosfilt(low_pass, wet), -1, 1)


dry = scene()
out = record(dry)
dump_mix(out)
```